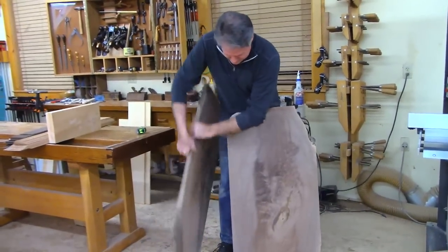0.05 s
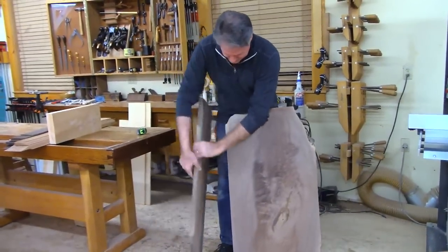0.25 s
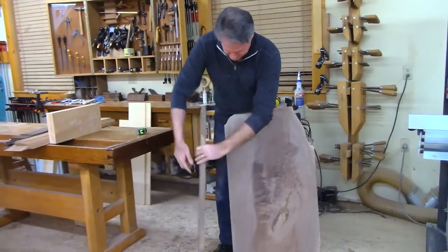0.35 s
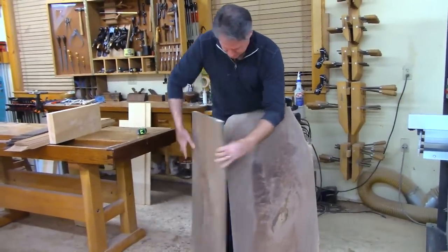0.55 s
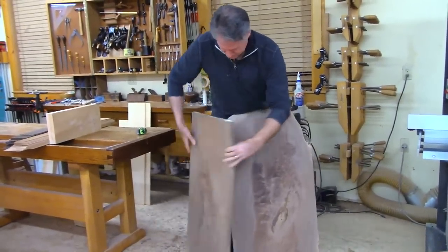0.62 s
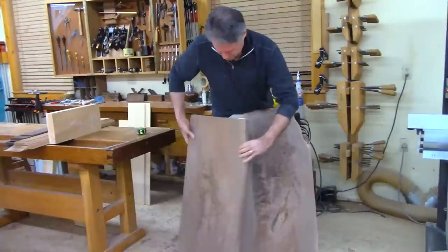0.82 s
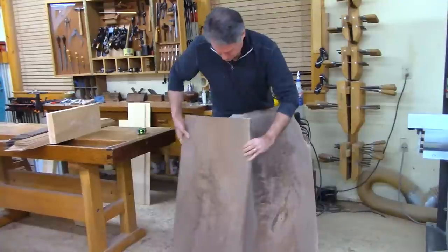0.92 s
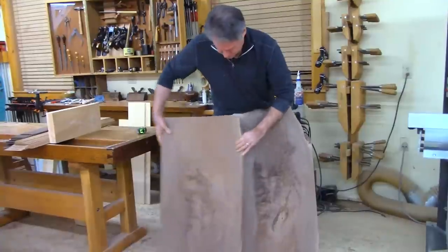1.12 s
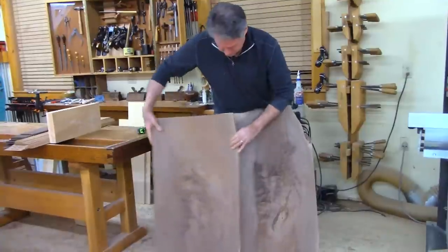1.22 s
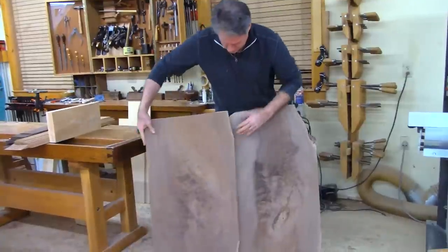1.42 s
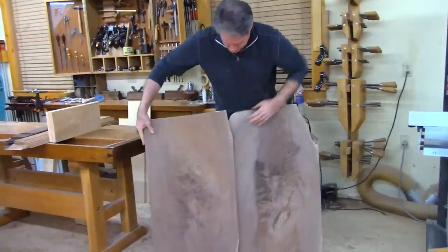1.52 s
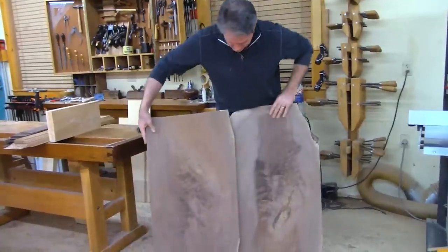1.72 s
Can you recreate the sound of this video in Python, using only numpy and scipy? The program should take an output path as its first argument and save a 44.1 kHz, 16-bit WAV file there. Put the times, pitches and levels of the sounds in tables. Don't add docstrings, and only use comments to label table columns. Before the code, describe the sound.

Heavy wooden slabs bump in a live workshop, heard from a few steps away. Over faint hiss and hum, one lands at 0.25 s with a deep, rapidly rocking thud and gritty scuff. An edge knocks and rattles at 0.62 s, a corner bumps dully at 0.83 s, and soft low shuffles follow. At 1.39 s two slabs clap loudly, chatter briefly and ring into the room, with barely audible settling near 1.67 s.

```python
import sys
import numpy as np
from scipy import signal
from scipy.fft import rfft, irfft
from scipy.io import wavfile
from scipy.ndimage import uniform_filter1d

SR = 44100
rng = np.random.default_rng(int(sys.argv[2]) if len(sys.argv) > 2 else 0)


def unload_wav(signal):
    wavfile.write(
        sys.argv[1],
        SR,
        np.round(np.clip(np.atleast_2d(signal).T, -1, 1) * 32767).astype(np.int16),
    )


def attenuation_scalar(level_db):
    decades = np.asarray(level_db, float) / 20
    return 10 ** decades


N = 77175

DETUNE = 0.012
FAVOUR_DB, FAVOUR_OCTAVES = 6.5, 0.2
SQUARE, LOOSE, SKEWED = 0.15, 1.0, 1.8


def contacts(rows, modes, crack, level_db, crack_db, crack_t60, rise_s, crack_rise_s, stray=LOOSE):
    out = np.zeros(N)
    t = np.arange(SR // 3) / SR
    hz, t60, db = np.transpose(modes)[:, :, None]
    modes_rms = np.sqrt((attenuation_scalar(db) ** 2).sum())
    for s, peak_db, *spot_hz in rows:
        near_db = 0
        for f in spot_hz:
            near_db = near_db + FAVOUR_DB * np.exp(-(np.log2(hz / f) / FAVOUR_OCTAVES) ** 2)
        mix_stray, pitch_stray, phase_stray = stray * rng.standard_normal((3, len(modes), 1))
        envelope = attenuation_scalar(db + near_db + 2 * mix_stray - 60 * t / t60)
        phase = 2 * np.pi * hz * (1 + DETUNE * pitch_stray) * t + 0.7 * phase_stray
        ring = (envelope * np.sin(phase)).sum(0) / modes_rms / 2
        ring = ring * (1 - np.exp(-t / rise_s)) ** 2
        snap = coloured(rng.standard_normal(len(t)), crack) * attenuation_scalar(crack_db - 60 * t / crack_t60)
        snap = snap * (1 - np.exp(-t / crack_rise_s)) ** 2
        add(out, s, attenuation_scalar(peak_db + level_db) * (ring + snap))
    return out


# t/s, level/dB, favoured f/Hz (some)
LANDING_HITS = [
    (.24, -7.5, 1100),
    (.254, -11),
    (.262, -9.5),
    (.281, -12.5),
    (.298, -13.5),
    (.318, -10.5),
    (.345, -16),
    (0.44, -27.5),
]
# f/Hz, t60/s, level/dB
LANDING_RING = [(362, 0.07, -12), (426, 0.13, -4.5), (497, 0.046, -2.5), (601, 0.038, 2), (728, 0.043, 2),
                (942, 0.032, 0.5), (1219, 0.035, -0.5), (1551, 0.065, -14)]
# f/Hz, level/dB per Hz
LANDING_SNAP = [(300, 5), (1000, -2.5), (1500, -7.5), (2100, -25.5), (4000, -33), (6500, -41),
                (9500, -39.5), (15500, -58)]


def landing():
    hits = contacts(LANDING_HITS, LANDING_RING, LANDING_SNAP, level_db=5.03, crack_db=-5.5,
                    crack_t60=0.086, rise_s=0.00068, crack_rise_s=0.0045)
    return room(hits, -2.9)


# t/s, level/dB, favoured f/Hz (some)
THUD_BLOWS = [
    (.247, -14),
    (.25, -2.5, 82),
    (.268, -4.5, 210),
    (.287, -5),
    (.302, -5.5, 76),
    (.323, -7, 120),
    (.343, -8, 170),
    (.375, -17.5),
    (.405, -24),
]
# f/Hz, t60/s, level/dB
THUD_RING = [(49, 0.069, -13), (75.2, 0.15, -1), (98.9, 0.068, -4), (121.4, 0.18, 0), (159.6, 0.32, -14),
             (208.3, 0.086, -0.5), (283.7, 0.092, -5.5)]


def thud():
    blows = contacts(THUD_BLOWS, THUD_RING, BUMP_SNAP, level_db=4.97, crack_db=-17.0,
                     crack_t60=0.1, rise_s=0.0011, crack_rise_s=0.0028)
    return room(blows, -13.5)


# t/s, level/dB
CLAP_HITS = [
    (1.3875, -9.5),
    (1.391, 1.5),
]
# t/s, level/dB, favoured f/Hz
CLAP_CHATTER = [
    (1.3965, -7, 694),
    (1.405, -8, 700),
    (1.424, -12, 852),
    (1.443, -15, 970),
    (1.456, -16.5, 545),
    (1.465, -11.5, 563),
    (1.4735, -12.5, 690),
    (1.489, -19.5, 1200),
    (1.505, -25.5, 1320),
]
# f/Hz, t60/s, level/dB
CLAP_RING = [(88, 0.091, -18), (166.3, 0.31, -20), (328, 0.022, -28), (456, 0.032, -17.5),
             (543.5, 0.097, -1), (597, 0.089, -6), (682, 0.054, 1), (752, 0.08, -14.5), (821, 0.067, -7),
             (936, 0.056, -10.5), (1017.6, 0.064, 1), (1202, 0.06, -8.5), (1493, 0.083, -16.5),
             (1793, 0.055, -19.5)]
# f/Hz, level/dB per Hz
CLAP_SNAP = [(300, 3.5), (543, -1), (1020, 1.5), (1700, -10), (2400, -29), (3600, -38), (9500, -53.5),
             (15500, -70)]


def clap():
    hits = contacts(CLAP_HITS, CLAP_RING, CLAP_SNAP, level_db=4.3, crack_db=-10.5,
                    crack_t60=0.037, rise_s=0.00045, crack_rise_s=0.0018, stray=SQUARE)
    chatter = contacts(CLAP_CHATTER, CLAP_RING, CLAP_SNAP, level_db=3.98, crack_db=-6,
                       crack_t60=0.052, rise_s=0.00077, crack_rise_s=0.0018, stray=SKEWED)
    return room(hits, -7.5) + room(chatter, -5)


# t/s, level/dB
KNOCK_HITS = [
    (.6125, -21),
    (.6157, 2),
]
# t/s, level/dB, favoured f/Hz
KNOCK_RATTLE = [
    (.641, -9, 520),
    (.631, -8, 300),
    (.66, -9.5, 305),
    (.678, -23, 364),
    (0.63, -13.5, 540),
    (.648, -17, 440),
    (0.64, -18, 480),
    (0.88, -27.5, 690),
]
# f/Hz, t60/s, level/dB
KNOCK_RING = [(75.6, 0.067, -16.5), (104, 0.047, -11), (183.3, 0.19, -18), (309, 0.047, -5.5),
              (356.4, 0.064, -4.5), (453, 0.066, 0), (496, 0.053, -4), (581, 0.033, -9), (660, 0.056, -34),
              (773, 0.033, -2.5), (990, 0.022, -10), (1346, 0.032, -22.5), (1680, 0.023, -36)]
# f/Hz, level/dB per Hz
KNOCK_SNAP = [(300, -16.5), (461, 8.5), (800, -15.5), (1400, -11.5), (2000, -30.5), (4000, -38),
              (9500, -51), (15500, -63.5)]


def knock():
    hits = contacts(KNOCK_HITS, KNOCK_RING, KNOCK_SNAP, level_db=4.06, crack_db=-12.5,
                    crack_t60=0.024, rise_s=0.00067, crack_rise_s=0.0005, stray=SQUARE)
    rattle = contacts(KNOCK_RATTLE, KNOCK_RING, KNOCK_SNAP, level_db=5.45, crack_db=-9,
                      crack_t60=0.059, rise_s=0.0013, crack_rise_s=0.0023, stray=SKEWED)
    return room(hits, -6) + room(rattle, -3)


# t/s, level/dB, favoured f/Hz (some)
BUMP_HITS = [
    (.833, -17, 54),
    (.852, -23.5, 54),
    (.872, -27.5),
    (1, -35),
    (0.96, -26),
    (0.99, -31.5),
    (1.2, -40),
]
# f/Hz, t60/s, level/dB
BUMP_RING = [(34.7, 0.11, 6.5), (55.8, .12, 7.5), (80.5, 0.087, 0.5), (113.2, 0.24, 0), (380, 0.063, -6),
             (474, 0.095, -10), (510, 0.032, -12), (780, .06, -37), (1070, .05, -37)]
# f/Hz, level/dB per Hz
BUMP_SNAP = [(300, 0), (700, -3), (1500, -12), (3000, -26), (6000, -45), (15500, -60)]


def bump():
    hits = contacts(BUMP_HITS, BUMP_RING, BUMP_SNAP, level_db=6.15, crack_db=-21.5,
                    crack_t60=0.096, rise_s=0.0023, crack_rise_s=0.0031, stray=SQUARE)
    return room(hits, 4.65)


# t/s, level/dB
CREEP_SHIFTS = [(.685, -37), (.705, -20), (.803, -16), (1.09, -30.5), (1.115, -26.5), (1.15, -25),
                (1.19, -25), (1.218, -21), (1.26, -27), (1.295, -24), (1.32, -36), (1.35, -25),
                (1.375, -22)]
# f/Hz, t60/s, level/dB
CREEP_RING = [(28, 0.13, -0.5), (40, 0.11, -8.5), (62, 0.15, -3.5), (100, .08, -47), (158.4, 0.088, -11),
              (458, 0.13, -25.5), (1080, 0.046, -37)]


def creep():
    shifts = contacts(CREEP_SHIFTS, CREEP_RING, BUMP_SNAP, level_db=6.0, crack_db=-20.0,
                      crack_t60=0.23, rise_s=0.0054, crack_rise_s=0.036)
    return room(shifts, -8)


# t/s, level/dB, favoured f/Hz
SETTLE_TOUCHES = [
    (1.63, -44, 247),
    (1.668, -36.5, 380),
    (1.7, -41.5, 220),
]


def settle():
    modes = THUD_RING[5:] + LANDING_RING[:3]
    touches = contacts(SETTLE_TOUCHES, modes, BUMP_SNAP, level_db=4.5, crack_db=-9.5,
                       crack_t60=0.11, rise_s=0.003, crack_rise_s=0.0029)
    return room(touches, -6)


# f/Hz, level/dB per Hz
SCUFF_COLOUR = [(2500, -3), (4500, 2), (7000, -5.5), (9200, -2.5), (11000, -8), (13500, -9), (15500, -21)]


def scuff():
    start_s, level_db, rise_s, t60 = 0.265, -45.5, 0.003, 1
    out = np.zeros(N)
    t = np.arange(SR // 2) / SR
    grain = attenuation_scalar(1.3 * evened(uniform_filter1d(rng.standard_normal(len(t)), size=150)))
    shape = (1 - np.exp(-t / rise_s)) ** 2 * attenuation_scalar(level_db - 60 * t / t60)
    add(out, start_s, shape * grain * coloured(rng.standard_normal(len(t)), SCUFF_COLOUR))
    return out


# t/s, level/dB, f/Hz
GRIT_TICKS = [
    (.2445, -62, 11400),
    (.2687, -49, 8600),
    (.283, -37, 5900),
    (0.5388, -37, 10900),
    (0.557, -49, 7600),
    (0.619, -61.5, 4800),
    (1.391, -43, 4000),
    (1.398, -57, 3430),
]


def grit():
    out = np.zeros(N)
    t = np.arange(300) / SR
    for s, db, hz in GRIT_TICKS:
        band = [(hz / 2, -22), (hz * 0.85, 0), (hz * 1.15, 0), (hz * 1.5, -10)]
        add(out, s, attenuation_scalar(db - 60 * t / 0.007) * coloured(rng.standard_normal(300), band))
    return room(out, -12)


# f/Hz, t60/s
ROOM_DECAY = [(60, 0.57), (250, 0.49), (700, 0.6), (1500, 0.61), (4000, 1), (10000, 0.53)]


def room(x, wet_db):
    early_s, early_db, early_fade_s = 0.093, 1.5, 0.008
    taps = np.zeros(SR)
    at = np.arange(200, SR - 20, 20)
    taps[at + rng.integers(0, 20, len(at))] = rng.choice([-1., 1.], len(at))
    hz, t, bands = signal.stft(taps, SR, nperseg=512)
    bands = bands * attenuation_scalar(-60 * t / read(ROOM_DECAY, hz)[:, None])
    tail = signal.istft(bands, SR, nperseg=512)[1][:SR]
    past_early = np.minimum((np.arange(SR) / SR - early_s) / early_fade_s, 50)
    tail = tail * attenuation_scalar(early_db / (1 + np.exp(past_early)))
    return x + attenuation_scalar(wet_db) * signal.fftconvolve(x, tail / np.linalg.norm(tail))[:N]


# f/Hz, level/dB per Hz
AIR_COLOUR = [(20, -3), (60, 2), (190, -6), (400, -11), (1300, -12), (2100, -22), (6000, -25), (15600, -32)]


def air():
    air_db, earlier_db, earlier_t60 = -52.5, -48, 0.55
    t = np.arange(N) / SR
    ring_colour = [(200, 2.0), (320, 5), (800, -9.0), (1400, -1.5), (2000, -17.5), (5000, -34.5)]
    ring = coloured(rng.standard_normal(N), ring_colour) * attenuation_scalar(earlier_db - 60 * t / earlier_t60)
    return attenuation_scalar(air_db) * coloured(rng.standard_normal(N), AIR_COLOUR) + ring


def read(points, hz):
    f, value = np.transpose(points)
    return np.interp(np.log(hz + 1), np.log(f + 1), value)


def evened(x):
    return x / np.sqrt(np.mean(x ** 2) + 1e-20)


def coloured(x, points):
    hz = np.fft.rfftfreq(len(x), 1 / SR)
    low_cut = np.minimum(hz / points[0][0], 1) ** 2
    return evened(irfft(rfft(x) * attenuation_scalar(read(points, hz)) * low_cut, len(x)))


def add(mix, s, sound):
    part = mix[round(s * SR):][:len(sound)]
    part += sound[:len(part)]


def scene():
    slabs = landing() + thud() + clap() + knock() + bump() + creep() + settle()
    return (slabs + scuff() + grit() + air())[None]


def roll_off(x):
    return signal.sosfilt(signal.butter(12, 15770, fs=SR, output="sos"), x)


def record(dry):
    band = signal.butter(2, [18, 15300], "band", fs=SR, output="sos")
    heard = signal.sosfilt(band, dry)
    held = 1.3 * np.tanh(heard / 1.3)
    return roll_off(held)


dry = scene()
out = record(dry)
unload_wav(out)
```